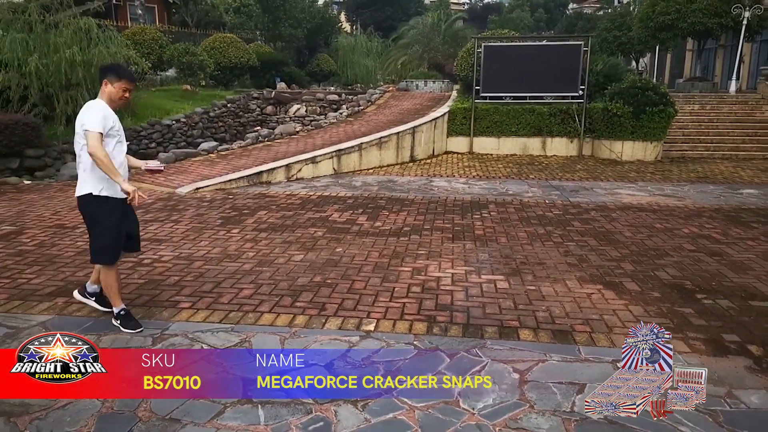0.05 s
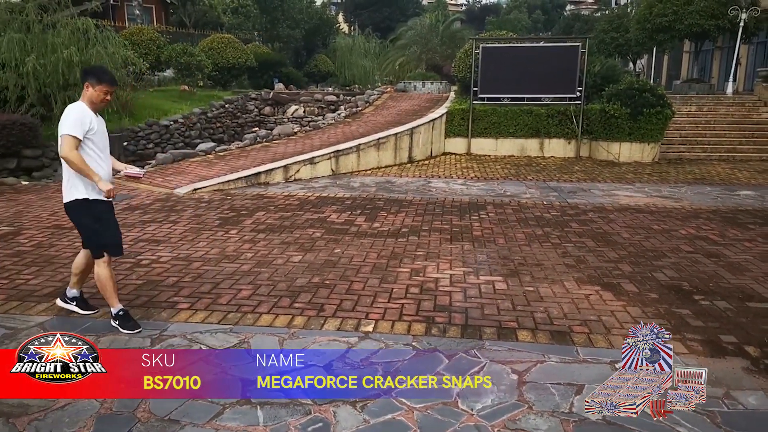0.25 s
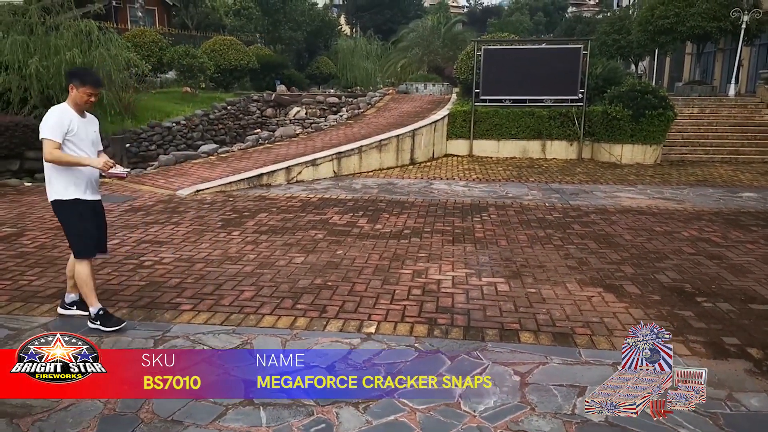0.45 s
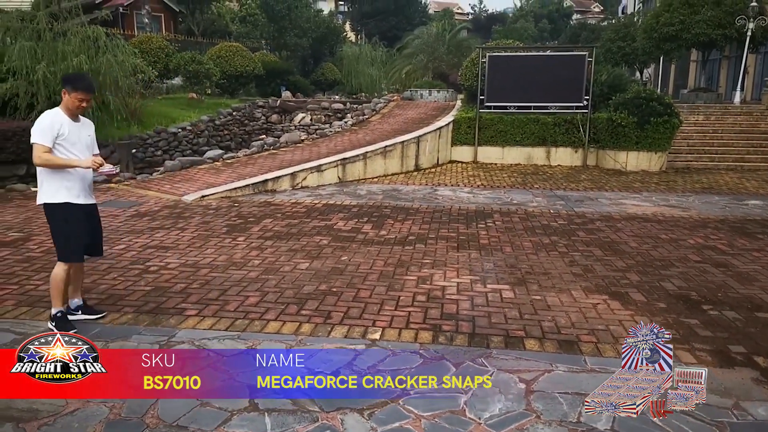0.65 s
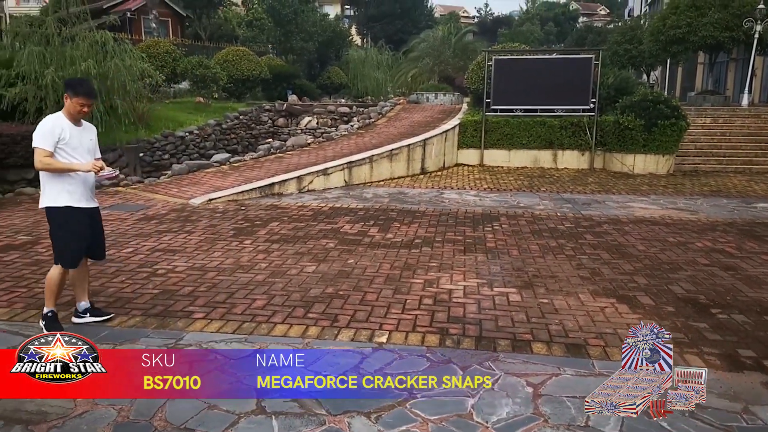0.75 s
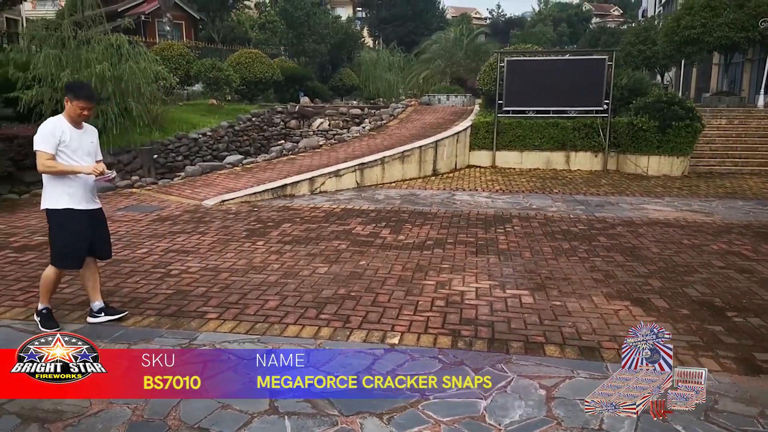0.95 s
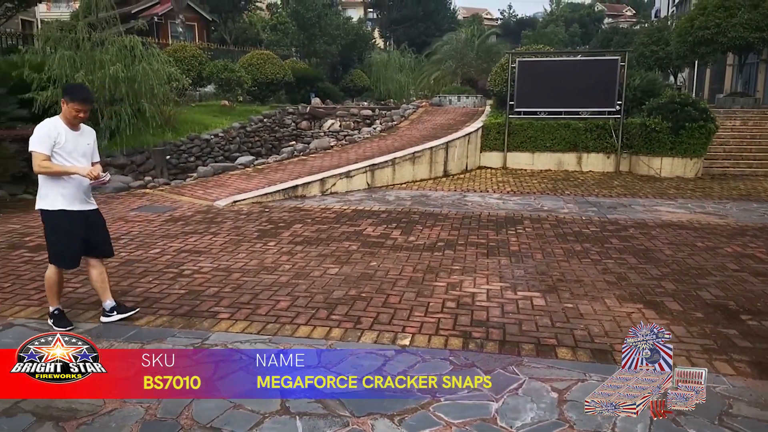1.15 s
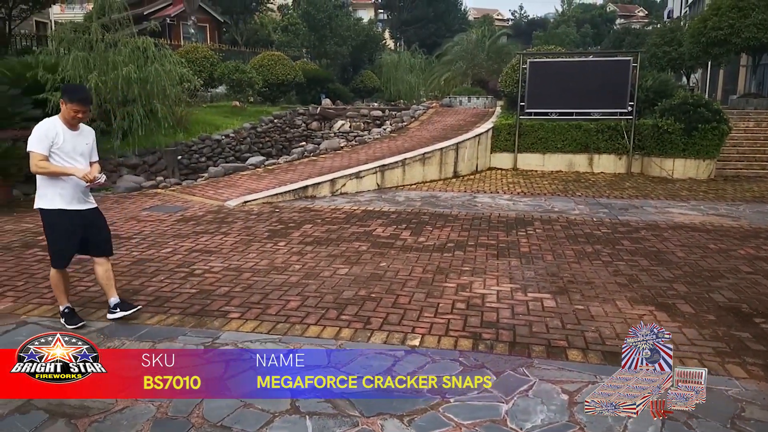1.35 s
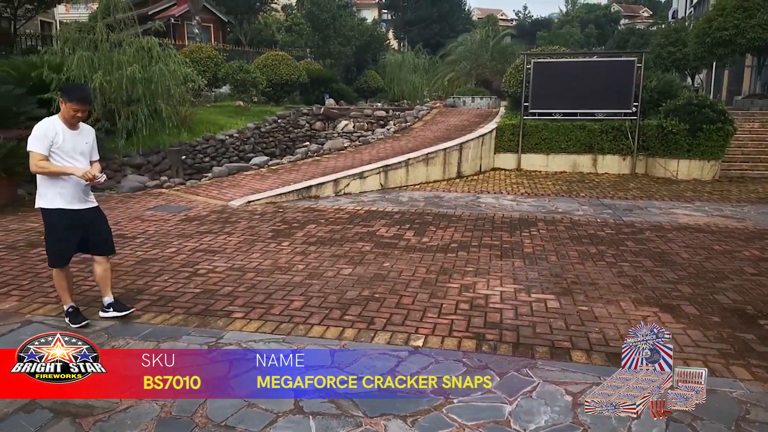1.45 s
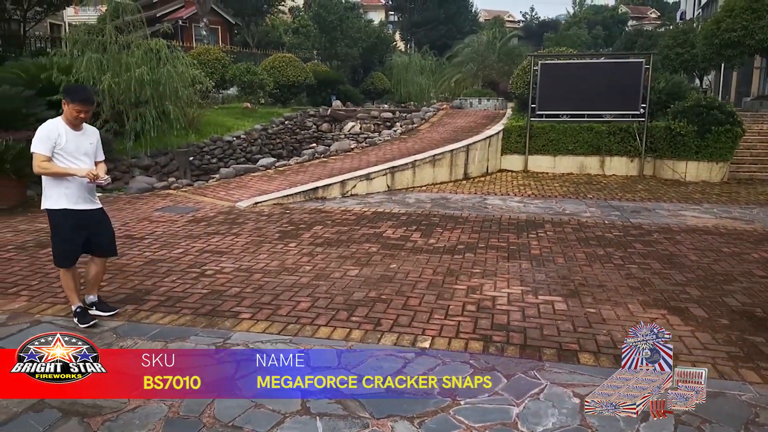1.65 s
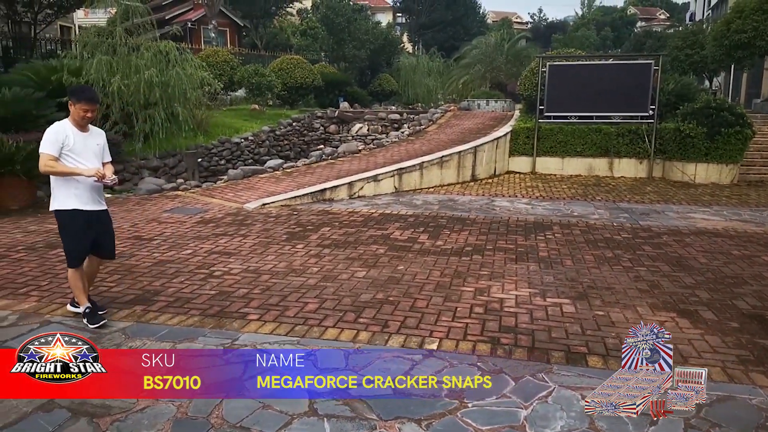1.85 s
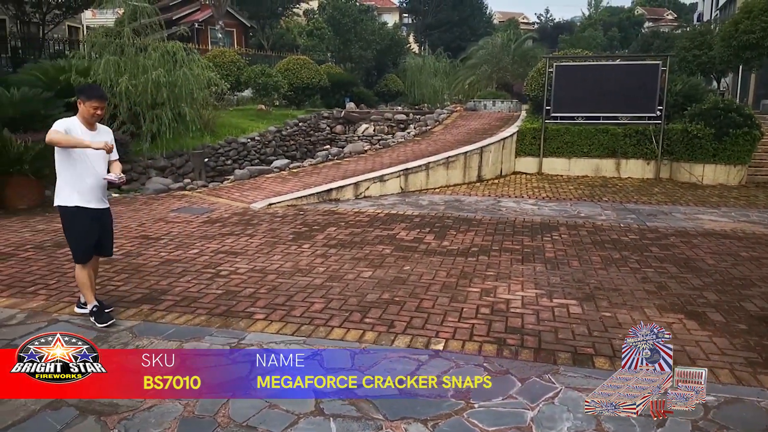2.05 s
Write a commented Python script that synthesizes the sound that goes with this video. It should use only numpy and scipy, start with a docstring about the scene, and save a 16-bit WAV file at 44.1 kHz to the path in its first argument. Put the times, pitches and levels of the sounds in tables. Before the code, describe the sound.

One sharp bang of a thrown snap firework outdoors, with short echoes and cicada drone.

```python
"""A brick plaza in summer, with a stereo microphone close enough to a snap firework to overload. Walls and
steps throw the crack back as separate slaps; bushes, stairs and a wooded slope add a rolling tail. Cicadas buzz
in the trees, their rib clicks ringing their bodies, over a low rumble of distant traffic and air. A faint low
bump swells in the rumble, a shoe scuffs the paving, and near the end a far vehicle horn sounds."""
import sys
import numpy as np
from scipy import signal
from scipy.fft import rfft, irfft
from scipy.io import wavfile
from scipy.ndimage import uniform_filter1d

SR = 44100
rng = np.random.default_rng(int(sys.argv[2]) if len(sys.argv) > 2 else 0)


def log_audio(samples):
    """Write samples as a 16-bit WAV file to the path given in sys.argv[1]."""
    # one column per channel
    frames = np.atleast_2d(samples).T
    # limit to full scale, then quantise
    limited = np.clip(frames, -1, 1)
    pcm = np.round(limited * 32767).astype(np.int16)
    wavfile.write(sys.argv[1], SR, pcm)


N = 92610
TIME = np.arange(N) / SR
BANG_S = 0.2186

# The blast and its bounces off the ground near the microphone. Each row: start in seconds, energy in dB,
# scatter decay in seconds, scattered share, left over right in dB, right ear lag in ms,
# tilt in dB per octave, favoured band in Hz, its lift in dB.
BLAST_PATHS = [(0.2186, 9, .0006, .25, -1, .03, 1, 5500, 4), (0.21912, 5, .0005, .6, 1, .07, 0, 3700, 6),
               (0.2200, 7.5, .0007, .3, 2, 0, -4.5, 2000, 4), (0.2204, 4.5, .0007, .95, 3, 0, 1.5, 7800, 8),
               (0.2236, 3.5, .0033, .98, -5, 0, .5, 4900, 7), (0.2258, -2, .0018, .9, -2, 0, -3, 800, 9)]
# Colour of the crack at close range. Each row: frequency in Hz, level in dB.
CRACK_COLOUR = [(100, -2), (400, -26), (850, -7), (1080, 2.5), (1400, 0.5), (2200, -2), (3100, 1),
                (3900, 0), (5600, 2), (6900, 4.5), (8000, 1.5), (10000, -11), (14500, -40), (17000, -32)]
# Short resonances in the crack. Each row: pitch in Hz, peak in dB, seconds to fall 60 dB.
CRACK_RINGS = [(884, -24.5, 0.029), (1447, -10.5, 0.0138), (2170, -6, 0.011), (2690, -21.5, 0.032)]
# Air pushing on the left, then the right capsule. Each row: peak of the push in dB,
# rise time in seconds, recovery corner in Hz.
PRESSURE_PUSH = [(-4.5, 0.0009, 177), (-8, 0.0013, 6)]
def snap():
    """Close up: the blast, its brief rings, and the low push of air that each capsule recovers from."""
    t = np.maximum(TIME - BANG_S, 0)
    crack = sum(arrival(CRACK_COLOUR, *row) for row in BLAST_PATHS)
    rings = sum(amp(db) * np.sin(2 * np.pi * hz * t) * die_away(t, t60) for hz, db, t60 in CRACK_RINGS)
    push = []
    for db, rise, recovery_hz in PRESSURE_PUSH:
        pulse = amp(db) * t / rise * np.exp(1 - t / rise)
        push.append(signal.lfilter(*signal.butter(1, recovery_hz, "high", fs=SR), pulse))
    return crack + rings + np.array(push)


# Paths back from the walls and steps. Each row: the same columns as BLAST_PATHS.
SLAP_PATHS = [(0.2598, -9, .0025, .95, -11, -0.1, 1, 5600, 10),
              (0.2781, 2, 0.0011, 0.47, -5, 0.41, .5, 1800, 4),
              (0.2823, -7, 0.0026, 0.3, -4, -0.13, 7, 1800, 5),
              (0.285, -14, 0.004, 0.92, -19.5, -0.33, -11.5, 750, 8),
              (0.3133, 4.8, .0024, .45, -1.5, -.3, -1.3, 1700, 6.5),
              (0.328, -10, 0.0034, 1.13, 4, 0.19, 0.5, 2600, 13),
              (0.348, -2, .0016, .9, -10.5, .3, -1.5, 2460, 11),
              (0.3542, -4, 0.0013, .9, 0, 0, 1.5, 2730, 11),
              (0.3602, -5, 0.0012, 1.05, -6, -0.11, 2, 2950, 12),
              (0.3816, -2, .003, .92, -1.5, -0.082, 1.5, 2200, 9.5),
              (0.4033, -7.5, 0.0075, 0.9, -4, -0.12, 2, 2100, -10),
              (0.444, -16, 0.0036, 1.15, 8, -0.1, 4.5, 920, 19)]
# Colour of a slap at the microphone. Each row: frequency in Hz, level in dB.
SLAP_COLOUR = [(100, -20), (350, -12), (900, -1.5), (2000, 1), (3200, -6), (5000, -6), (6300, -9.5),
               (8000, -7), (9000, -13), (10000, -26), (15000, -50)]
def slaps():
    """Hard surfaces around the plaza each return a separate echo."""
    return sum(arrival(SLAP_COLOUR, *row) for row in SLAP_PATHS)


# Returns from bushes, stairs and slope. Each row: start in seconds, rise in seconds, level in dB,
# seconds to fall 60 dB, tilt in dB per octave, lift around STAIRS_HZ in dB.
DIFFUSE_RETURNS = [(0.226, 0.002, -38.5, 0.63, -2, 1), (0.272, 0.0059, -26.5, 0.6, 0.5, 1.5),
                   (0.314, 0.021, -18.5, 0.27, 0.5, 9), (0.367, 0.025, -29.5, 2.18, 0.5, -1),
                   (0.53, 0.009, -32.5, 0.7, -1, 5)]
# Colour of the tail. Each row: frequency in Hz, level in dB.
TAIL_COLOUR = [(60, -24), (200, -4.5), (400, -4), (900, 1.5), (2000, 4.5), (3200, 3), (5000, 0.5),
               (6300, -7), (8000, -4), (10000, -26), (13500, -26.5), (16000, -41.5)]
STAIRS_HZ, STAIRS_OCT, AIR_DB_PER_S_KHZ = 2550, 0.36, 1.5
def echo_cloud(start, rise, db, t60, tilt_db, stairs_db):
    """A grainy cloud of echoes swells, dies away and dulls with distance."""
    def shape_db(s, hz):
        octaves = np.log2((hz + 20) / STAIRS_HZ)
        stairs = stairs_db * np.exp(-(octaves / STAIRS_OCT) ** 2)
        air_loss = AIR_DB_PER_S_KHZ * np.maximum(s - start, 0) * hz / 1000
        return read(TAIL_COLOUR, hz) + tilt_db * np.maximum(octaves, -3) + stairs - air_loss
    cloud = noise(shape_db, size=512)
    cloud /= cloud[:, :round(start * SR)].std()  # rms 1 before the air dulls it
    t = np.maximum(TIME - start, 0)
    grain_db = 1.5 * wander(rate_hz=250)
    return cloud * np.minimum(t / rise, 1) * die_away(t, t60) * amp(db + grain_db)


# Cicadas in the trees. Each row: resonance in Hz, width in Hz, level in dB, left over right in dB,
# rib clicks per second, click depth from 0 to 1.
CICADA_RESONANCES = [(3712, 200, -54, -6.5, 170, .1), (4730, 108, -54, -6, 147, 0.4),
                     (5016, 126, -48.5, -8.5, 25, 0), (5810, 106, -48.5, -5.5, 67, 0.5),
                     (5984, 89, -49.5, -5.5, 91, 0), (6234, 100, -43.5, 0, 170, 0.4),
                     (6507, 180, -44, -11.5, 520, 0.5), (6790, 66, -49.5, 6, 300, 0),
                     (7220, 200, -53, -15.5, 560, 0.6), (7570, 190, -54.5, -4, 250, 0.54),
                     (8270, 330, -47.5, -5, 380, 1)]
# Colour of the chorus farther off. Each row: frequency in Hz, level in dB.
CHORUS_COLOUR = [(2500, -25), (3300, -26), (4050, -4.5), (4380, -12.5), (4750, -1.5), (5200, 0),
                 (5450, -4.5), (5800, -2), (7200, 1.5), (8000, -0.5), (8400, -2), (9000, -2.5),
                 (10000, -14), (11000, -21), (13500, -33), (16000, -47)]
THROB_HZ, THROB_DEPTH, CHORUS_DB = 50.5, 0.27, -39.5
def cicadas():
    """Throbbing trains of rib clicks ring the insects' resonances, over a smooth far chorus."""
    clock = TIME + np.cumsum(0.004 * wander(rate_hz=0.86)) / SR  # the pace drifts slightly
    throb = 1 + THROB_DEPTH * np.cos(2 * np.pi * THROB_HZ * clock)
    f = np.fft.rfftfreq(N, 1 / SR)
    chorus = noise(lambda s, hz: read(CHORUS_COLOUR, hz), size=512, patchy_db=1.0)
    out = amp(CHORUS_DB) * pan(db=-1) * unit(chorus)
    for hz, width, db, pan_db, rate, depth in CICADA_RESONANCES:
        ring = irfft(rfft(rng.standard_normal((2, N))) / (1 + 2j * (f - hz) / width) ** 2, N)
        clicks = 1 + depth * np.cos(2 * np.pi * (rate * clock + rng.random()))
        out += amp(db) * pan(pan_db) * unit(ring * throb * clicks)
    return out


# A faint low bump in the rumble, then a scuff. Each row: centre in seconds, half length in seconds, centre in
# Hz, half width in Hz, level in dB.
FAINT_SOUNDS = [(1.114, 0.049, 158, 39.7, -47.5), (2.01, 0.037, 3700, 560, -50.5)]
def faint_sound(centre_s, half_s, centre_hz, width_hz, db):
    """A brief, faint burst of band-limited noise: a low bump, or a shoe brushing the paving."""
    grit = unit(noise(lambda s, hz: -20 * np.log10(1 + ((hz - centre_hz) / width_hz) ** 4), size=2048))
    return amp(db) * grit * np.exp(-((TIME - centre_s) / half_s) ** 2)


HORN_START_S, HORN_RISE_S, HORN_DB, HORN_FADE_DB_PER_S = 1.76, 0.037, -59, 3
HORN_HZ, BELL_HZ, BELL_DB_PER_OCT, BLUR_HZ = 430.3, 2280, 7, 13
def horn():
    """A far horn holds one pitch, strongest at its bell's resonance; the way here blurs each harmonic."""
    f = np.fft.rfftfreq(N, 1 / SR)
    spectrum = 0
    for hz in HORN_HZ * np.arange(3, 8):
        bell_gain = amp(-BELL_DB_PER_OCT * abs(np.log2(hz / BELL_HZ)))
        spectrum += bell_gain / (1 + ((f - hz) / BLUR_HZ) ** 2)
    tone = unit(irfft(spectrum * np.exp(2j * np.pi * rng.random((2, len(f)))), N))
    t = np.maximum(TIME - HORN_START_S, 0)
    return tone * np.minimum(t / HORN_RISE_S, 1) * amp(HORN_DB - HORN_FADE_DB_PER_S * t)


# Colour of the rumble from beyond the plaza. Each row: frequency in Hz, level in dB.
RUMBLE_COLOUR = [(15, -26.5), (35, -10), (57, 6.5), (80, -8), (160, -6.5), (260, -15.5), (400, -20),
                 (1000, -21), (1700, -28.5), (3000, -30.5), (8000, -69)]
# Its slow swell. Each row: time in seconds, bass lift in dB.
BASS_SWELL = [(0, 6.5), (.2, -1), (.45, -2.5), (.7, 3), (.95, 2.5), (1.15, 6), (1.45, 0.5), (1.7, 0),
              (1.9, 4), (2.1, 1.5)]
RUMBLE_DB = -47
def rumble():
    """Low, lumpy hum of distant traffic and air; its bass swells and sinks."""
    def shape_db(s, hz):
        swell_db = np.interp(s, *np.transpose(BASS_SWELL))
        return read(RUMBLE_COLOUR, hz) + swell_db / (1 + (hz / 500) ** 2)
    return amp(RUMBLE_DB) * pan(db=-3) * unit(noise(shape_db, size=2048, patchy_db=1.5))


# How alike the two capsules hear diffuse sound. Each row: frequency in Hz, correlation from -1 to 1.
STEREO_LIKENESS = [(60, 0.97), (200, 0.89), (380, 0.69), (700, 0.36), (1300, -0.57), (2400, -0.16),
                   (4400, -0.019), (8000, -0.13), (15000, 0.084)]
def noise(shape_db, size, patchy_db=0):
    """Noise from all around the microphone, shaped by shape_db(s, Hz), with optional drifting patches."""
    hop = size // 4
    frames, hz = N // hop + 5, np.fft.rfftfreq(size, 1 / SR)
    a, b, c, d, patches = rng.standard_normal((frames, len(hz), 5)).T
    patches = unit(uniform_filter1d(uniform_filter1d(patches, size=6, axis=0), size=10, axis=1))
    likeness = read(STEREO_LIKENESS, hz)[:, None]
    left = a + 1j * b
    right = likeness * left + np.sqrt(1 - likeness ** 2) * (c + 1j * d)
    gain = amp(shape_db(np.arange(frames) * hop / SR, hz[:, None]) + patchy_db * patches)
    return signal.istft(np.array([left, right]) * gain, nperseg=size, noverlap=size - hop)[1][:, :N]


BAND_OCT, SPRAY_HZ = .32, 903  # half width of the favoured band; rough surfaces scatter above SPRAY_HZ
def arrival(colour, start, db, decay, share, pan_db, lag_ms, tilt_db, band_hz, band_db, size=4096):
    """One path to the microphone: a sharp wavefront and a short spray of scattered sound."""
    hz, t = abs(np.fft.fftfreq(size, 1 / SR)), np.arange(size) / SR
    band = band_db * np.exp(-(np.log2((hz + 1) / band_hz) / BAND_OCT) ** 2)
    tilt = tilt_db * np.log2((hz + 200) / 2500)
    log_gain = np.log(amp(read(colour, hz) + band + tilt))
    front = np.exp(np.conj(signal.hilbert(log_gain)))[:size // 2 + 1]  # minimum phase: a sharp onset
    front /= np.sqrt(np.mean(np.exp(2 * log_gain)))  # energy 1
    rough = hz[:len(front)] / np.hypot(hz[:len(front)], SPRAY_HZ)
    scatter = rng.standard_normal((2, size)) * np.exp(-t / decay)
    spray = irfft(front * rough * rfft(scatter))
    spray /= np.linalg.norm(spray, axis=1, keepdims=True)
    share = np.clip(share, 0, 1)
    sound = np.sqrt(1 - share) * irfft(front) + np.sqrt(share) * spray
    out = np.zeros((2, N))
    for ear, s in enumerate((start, start + lag_ms / 1000)):
        out[ear, round(s * SR):][:size] = sound[ear]
    return amp(db) * pan(pan_db) * out


def amp(db):
    """Decibels to gain."""
    return 10 ** (np.asarray(db) / 20)


def die_away(t, t60):
    """Falls 60 dB in t60 seconds."""
    return np.exp(-np.log(1000) * t / t60)


def unit(x):
    """Scales to rms 1."""
    return x / np.sqrt(np.mean(x ** 2) + 1e-20)


def read(points, hz):
    """Reads a table on a log-frequency axis."""
    f, value = np.transpose(points)
    return np.interp(np.log(hz + 1), np.log(f + 1), value)


def pan(db):
    """Left and right gains, db apart."""
    return amp(np.array([[db / 2], [-db / 2]]))


def wander(rate_hz):
    """Smooth random motion of rms 1."""
    f = np.fft.rfftfreq(N, 1 / SR)
    return unit(irfft(rfft(rng.standard_normal(N)) / (1 + (f / rate_hz) ** 4), N))


def scene():
    """The plaza from the microphone's spot: the snap and its echoes over the summer background."""
    echoes = slaps() + sum(echo_cloud(*row) for row in DIFFUSE_RETURNS)
    return snap() + echoes + cicadas() + rumble() + horn() + sum(faint_sound(*row) for row in FAINT_SOUNDS)


# Gain control behind the microphone, a held stage and a quick one.
# Each row: share of the excess taken off, recovery in dB per second.
GAIN_STAGES = [(0.201, 0.12), (.5, 169)]
LIMIT_DB, BAND_LIMIT_HZ = -26.5, 16300
def record(dry):
    """The close crack clips and pulls the gain down, partly for a moment and partly for long."""
    power = signal.lfilter(*signal.butter(1, 25, fs=SR), (dry ** 2).mean(0))
    over_db = np.maximum(10 * np.log10(power + 1e-12) - LIMIT_DB, 0)
    stages_db = [np.maximum.accumulate(share * over_db + rate * TIME) - rate * TIME
                 for share, rate in GAIN_STAGES]
    duck_db = signal.lfilter(*signal.butter(1, 14, fs=SR), np.max(stages_db, axis=0))
    clipped = np.clip(dry * amp(-duck_db), -.95, .95)
    lowpass = signal.firwin(127, BAND_LIMIT_HZ, window=("kaiser", 8), fs=SR)
    return signal.oaconvolve(clipped, lowpass[None], "same")


dry = scene()
out = record(dry)
log_audio(out)
```